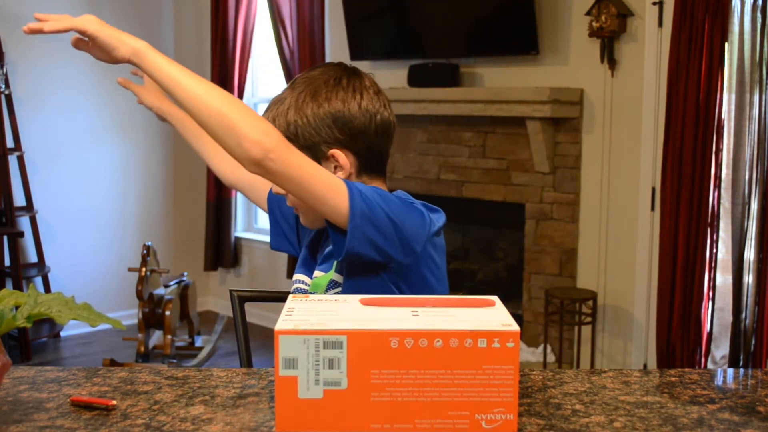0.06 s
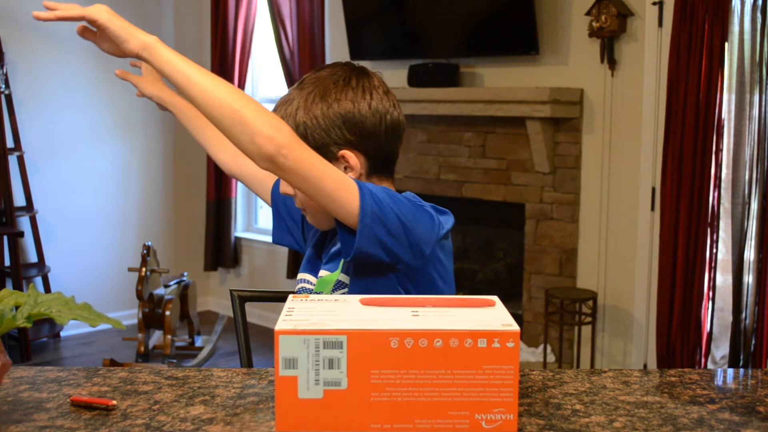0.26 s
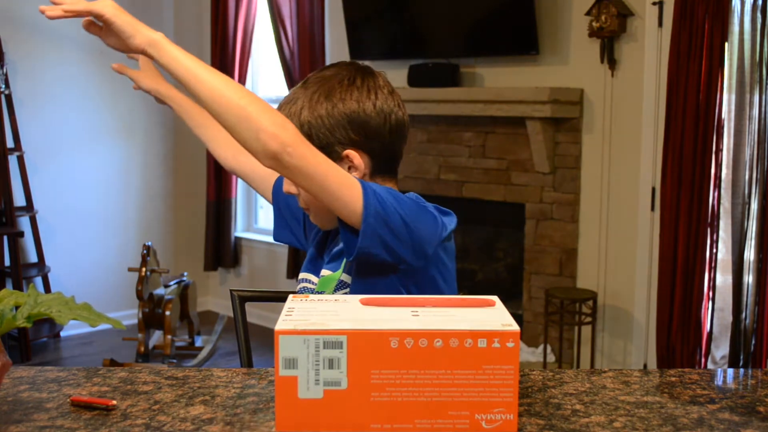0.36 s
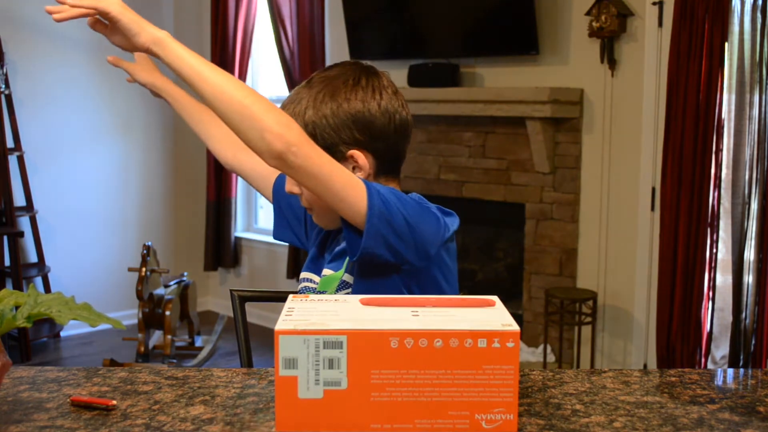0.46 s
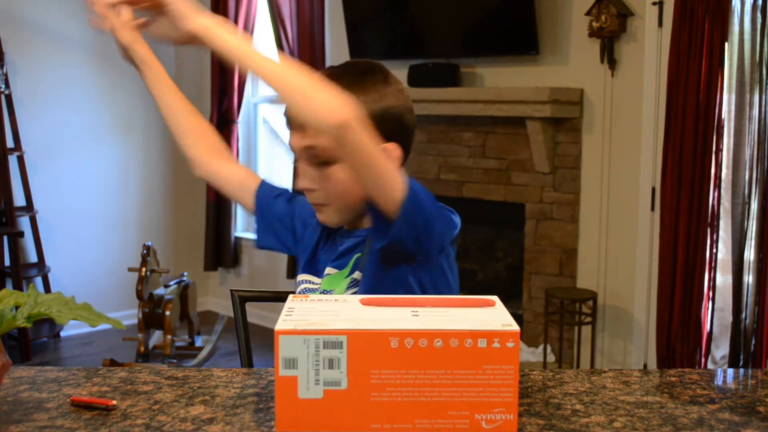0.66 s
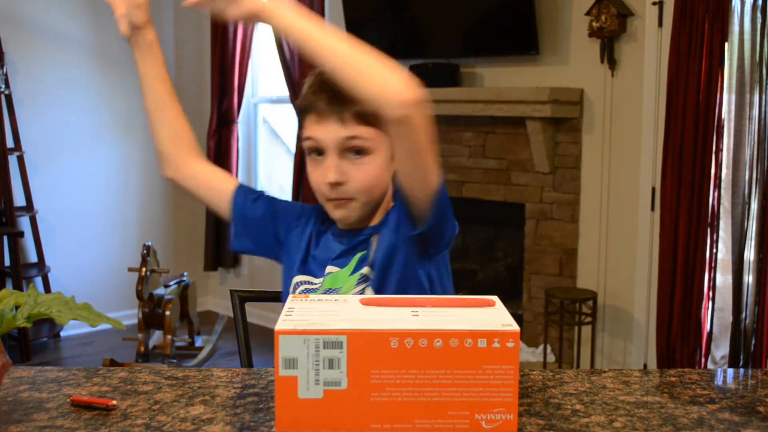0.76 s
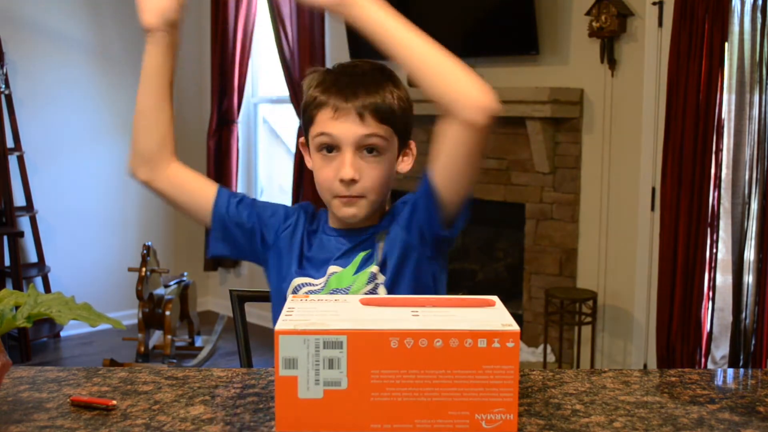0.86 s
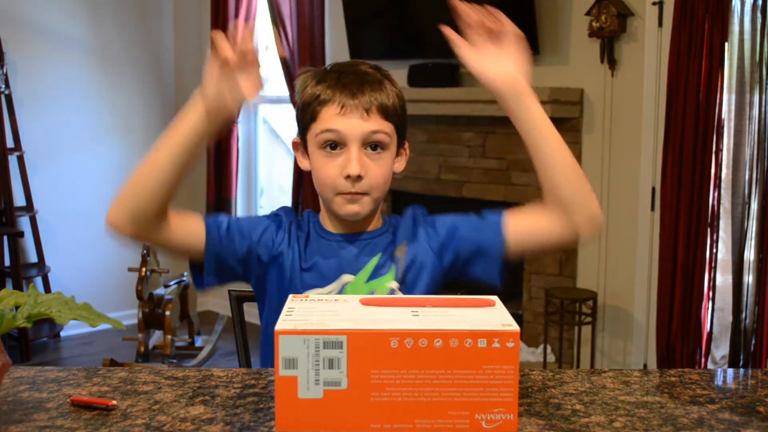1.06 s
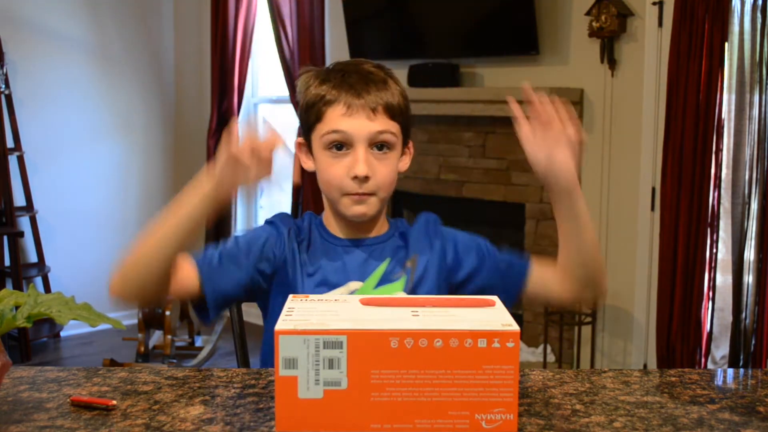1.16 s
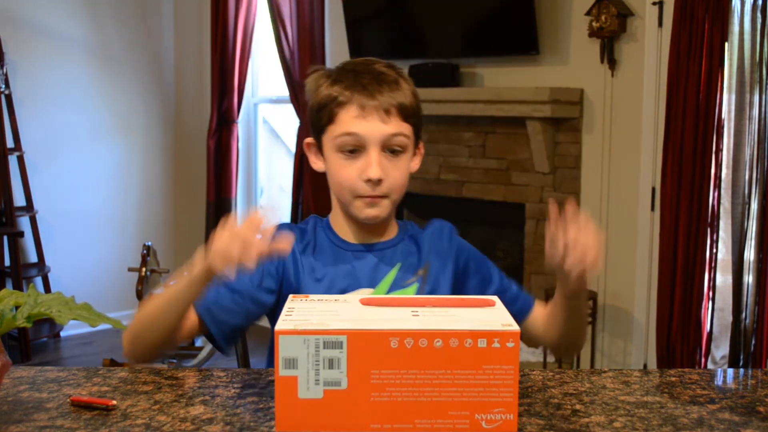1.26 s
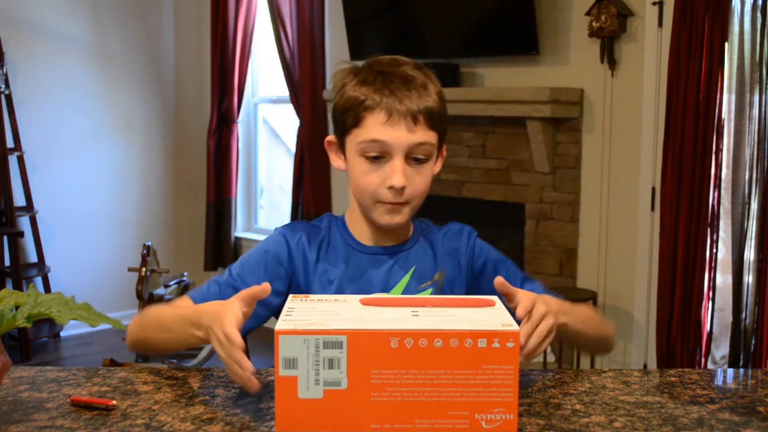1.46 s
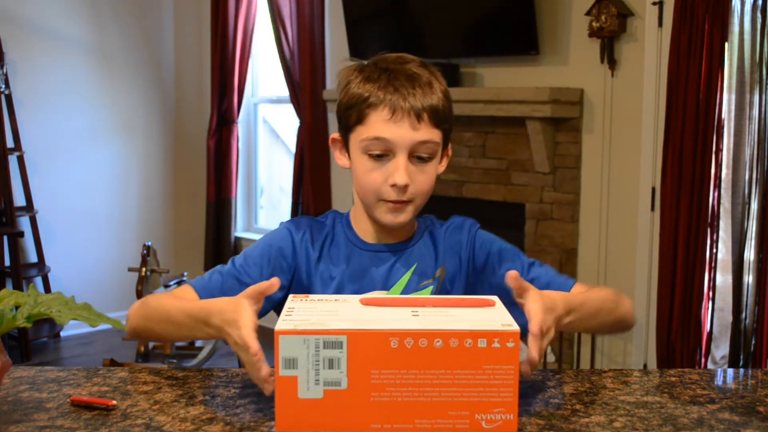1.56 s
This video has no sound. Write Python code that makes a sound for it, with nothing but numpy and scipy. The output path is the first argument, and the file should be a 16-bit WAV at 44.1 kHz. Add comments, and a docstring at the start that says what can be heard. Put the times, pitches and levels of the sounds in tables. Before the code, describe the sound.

An empty cardboard box lands on a hard floor a few metres away at about 0.2 seconds, with one loud, hollow thump that briefly overloads the microphone. The large room rings for most of a second. A faint bump follows at 0.5 seconds, then light taps from 0.8 to 1 second as the box settles. Sleeves rustle softly from 0.7 seconds, over quiet room tone and a faint appliance whine.

```python
"""Tossed carton in a live room

An empty cardboard carton lands on a hard floor a few metres away: an edge touches, the faces slap down,
later it tips over and settles. Each contact rings its panels and air, thuds and cracks; the large room
rings on for most of a second. Sleeves rustle, the treble swishes faintly twice, an appliance whines
faintly over the room tone, and the loudest peaks overload the microphone."""
import sys
import numpy as np
from scipy import signal
from scipy.io import wavfile

SR = 44100
rng = np.random.default_rng(int(sys.argv[2]) if len(sys.argv) > 2 else 0)


def put_to_file(sound):
    """Save the sound as 16-bit audio at rate SR, in the file named by the first command-line argument."""
    columns = np.atleast_2d(sound).T  # one column per channel
    safe = np.clip(columns, -1, 1)
    whole_steps = np.round(safe * 32767)
    wavfile.write(sys.argv[1], SR, whole_steps.astype(np.int16))


N = 70560

# Floor contacts. Each row: start in seconds, strength in dB, crack offset in dB, thud offset in dB,
# favoured pitch in Hz.
CONTACTS = [(0.1927, -5, 5.5, 8.5, 800), (0.199, -4, 8.5, -5, 620), (0.209, 4, -6, 1, 510),
            (0.221, -9.5, -16, -8, 450), (0.235, -1.5, -6, -15, 338), (0.247, -3, -7.5, -9.5, 310),
            (0.260, -0.5, -13.5, -15.5, 401), (0.294, -20.5, -19.5, -2, 445), (0.504, -24, -17, -3.5, 480),
            (0.810, -25.5, -10, 2, 480), (0.856, -36.5, -11, 1.5, 560), (0.940, -36, -16, -6, 302.4),
            (0.980, -30, -21, 1, 517), (1.02, -35.5, -15, -11, 521)]
# Spectrum of the echoes and the crack. Each row: frequency in Hz, relative density in dB.
IMPACT_SPECTRUM = [(30, -48), (60, -31), (85, -5.5), (150, -14.5), (230, -5), (300, -7.5), (430, -4.5),
                   (620, -8), (900, -13.5), (1300, -17), (2000, -23), (2600, -30), (3300, -24),
                   (4500, -48.5), (8000, -54), (12000, -59.5), (15400, -83)]


def from_db(db):
    """Decibels to gain."""
    return 10 ** (np.asarray(db) / 20)


def unit_rms(x):
    """Scale to rms 1."""
    return x / np.sqrt(np.mean(x ** 2) + 1e-20)


def at_hz(points, hz):
    """Interpolate a table on a log-frequency axis."""
    points_hz, values = np.transpose(points)
    return np.interp(np.log(hz), np.log(points_hz), values)


def drift(rate_hz):
    """Slow random wander, rms about 1."""
    hop, warm_up = 40, 2000
    pole = np.exp(-2 * np.pi * rate_hz * hop / SR)
    white = rng.standard_normal(N // hop + warm_up + 2)
    slow = signal.lfilter([1], [1, -2 * pole, pole * pole], white)[warm_up:]
    return np.interp(np.arange(N) / hop, np.arange(len(slow)), unit_rms(slow))


def ring(drive, hz, t60_s):
    """Resonator: a unit click starts a decaying sine of height 1."""
    pole, step_rad = from_db(-60 / (t60_s * SR)), 2 * np.pi * hz / SR
    return signal.lfilter([0, np.sin(step_rad)], [1, -2 * pole * np.cos(step_rad), pole * pole],
                          drive + 1e-18)


def noise_bands(spectrum):
    """Yield centre in Hz and noise for each third octave of a spectrum."""
    edges_hz = 25 * 2 ** (np.arange(29) / 3)
    white = rng.standard_normal((2, N + 8000))
    for k, (low_hz, high_hz) in enumerate(zip(edges_hz, edges_hz[1:])):
        hz = np.sqrt(low_hz * high_hz)
        band = signal.butter(2, [low_hz, high_hz], "band", fs=SR, output="sos")
        yield hz, from_db(at_hz(spectrum, hz)) * signal.sosfilt(band, white[k % 2])[-N:]


def contact_clicks(gains):
    """One click per floor contact."""
    clicks = np.zeros(N)
    clicks[(np.array(CONTACTS)[:, 0] * SR).astype(int)] = gains
    return clicks


def strike_modes(modes, strength_db, falloff_db_per_octave):
    """Each soft contact drives every mode, falling off from its favoured pitch; signs alternate."""
    scatter_db, build_up_cycles = 1.5, 4.7
    favoured_hz = np.array(CONTACTS)[:, 4]
    chance_db = scatter_db * rng.standard_normal((len(strength_db), len(modes)))
    out = 0
    for k, (hz, level_db, t60_s) in enumerate(modes):
        octaves_away = np.minimum(np.abs(np.log2(hz / favoured_hz)), 1.5)
        drive_db = strength_db + level_db - falloff_db_per_octave * octaves_away + chance_db[:, k]
        burst = ring(contact_clicks(from_db(drive_db)), hz, build_up_cycles / hz)
        burst_gain = 2 * np.log(1000) * hz / (SR * build_up_cycles)   # drives the mode like one click
        out = out + (-1) ** k * ring(burst_gain * burst, hz, t60_s)
    return out


def appliance_whine(width_hz=15):
    """Faint narrow lines, wavering in level and phase."""
    # Each row: frequency in Hz, rms level in dB.
    lines = [(161.5, -61), (527.6, -66), (2293, -76), (2353, -79), (2589, -78), (3316, -83)]
    t = np.arange(N) / SR
    out = 0
    for hz, level_db in lines:
        phase = 2 * np.pi * hz * t
        line = drift(width_hz) * np.sin(phase) + drift(width_hz) * np.cos(phase)
        out = out + from_db(level_db) * unit_rms(line)
    return out


def room_tone(level_db=-49):
    """Steady, mostly low background noise."""
    # Each row: frequency in Hz, relative density in dB.
    spectrum = [(15, -72), (25, -30), (43, -6), (86, -10.5), (160, 2), (204, -5.5), (297, -7.5), (495, -11),
                (536, -9), (683, -12), (2350, -31), (3720, -35), (15400, -59)]
    return from_db(level_db) * unit_rms(sum(noise for _, noise in noise_bands(spectrum)))


def carton(crack_t60_s=0.03):
    """Direct sound of the contacts: ringing panels and air, floor thud, papery crack."""
    # Panels and enclosed air. Each row: frequency in Hz, relative level in dB, T60 in seconds.
    box_modes = [(302, -2.5, 0.077), (411.2, -4, 0.13), (530, -1.5, 0.05), (607, -8.5, 0.02),
                 (740, -20, 0.04), (873, -5, 0.12), (1085, -19.5, 0.09), (1577, -27, 0.055),
                 (2060, -32, 0.028), (3460, -34, 0.036)]
    # Floor thud. Each row: frequency in Hz, relative level in dB, T60 in seconds.
    thud_modes = [(77.4, -37, .25), (91.4, -21, 0.3), (139.2, -23, 0.12)]
    _, strength_db, crack_db, thud_db, _ = np.transpose(CONTACTS)
    crack_clicks = contact_clicks(from_db(strength_db + crack_db - 30))
    crack_envelope = signal.lfilter([1], [1, -from_db(-60 / (crack_t60_s * SR))], crack_clicks)
    crack_noise = unit_rms(sum(noise for hz, noise in noise_bands(IMPACT_SPECTRUM) if hz > 900))
    box = strike_modes(box_modes, strength_db, falloff_db_per_octave=15.5)
    thud = strike_modes(thud_modes, strength_db + thud_db, falloff_db_per_octave=0)
    return box + thud + crack_envelope * crack_noise


def room_reverb(echo_db=-12.5, rise_s=0.004):
    """Each contact excites standing waves and diffuse echoes that swell, then die band by band."""
    # Room modes. Each row: frequency in Hz, relative level in dB, T60 in seconds.
    standing_waves = [(215.4, -24, 0.41), (257, -23.5, 1.69), (280, -28, 1.2), (299.6, -14, 1),
                      (409.6, -22.5, 0.77), (447, -23, .6), (466.6, -20, 0.42), (487, -30.5, 0.69),
                      (532.4, -33.5, 1.3), (603, -35, 0.22)]
    # Echo decay. Each row: frequency in Hz, T60 in seconds.
    decay_times = [(60, 0.67), (120, 0.27), (170, 0.74), (300, 0.7), (500, 0.84), (1100, 0.82),
                   (2900, 0.76), (5500, 0.49), (9000, 0.36), (14000, .3)]
    start_s, strength_db, crack_db, thud_db, _ = np.transpose(CONTACTS)
    t = np.arange(N) / SR
    bands = list(noise_bands(IMPACT_SPECTRUM))
    echo_gain = from_db(echo_db) / np.std(sum(noise for _, noise in bands))
    swell = 1 - np.exp(-t / rise_s)
    out = strike_modes(standing_waves, strength_db, falloff_db_per_octave=7.75)
    for hz, noise in bands:
        crack_weight = np.clip(np.log2(hz / 700) / 3, 0, 2)
        thud_weight = np.clip(np.log2(200 / hz), 0, 1)
        drive_db = strength_db + crack_weight * crack_db + thud_weight * thud_db
        energy = contact_clicks(from_db(drive_db) ** 2)
        power_tail = swell * from_db(-60 * t / at_hz(decay_times, hz)) ** 2
        power = np.maximum(signal.fftconvolve(energy, power_tail)[:N], 0) * (t >= start_s[0])
        out = out + echo_gain * np.sqrt(power) * noise
    return out


def swishes(low_hz=4470):
    """Two faint Gaussian swells of treble noise."""
    # Each row: centre in seconds, sigma in seconds, rms level at the centre in dB, upper edge in Hz.
    swells = [(0.45, 0.046, -71.5, 12000), (0.95, 0.058, -70.5, 7900)]
    t, white = np.arange(N) / SR, rng.standard_normal(N)
    out = 0
    for centre_s, sigma_s, level_db, high_hz in swells:
        band = signal.butter(2, [low_hz, high_hz], "band", fs=SR, output="sos")
        envelope = from_db(level_db) * np.exp(-0.5 * ((t - centre_s) / sigma_s) ** 2)
        out = out + envelope * unit_rms(signal.sosfilt(band, white))
    return out


def sleeves(flutter_db=0.05):
    """Cloth noise that swells and fades as the arms move."""
    # Rustle envelope. Each row: time in seconds, rms level in dB.
    contour = [(0.698, -54.5), (0.78, -51.5), (0.818, -47.5), (0.89, -54.5), (0.97, -49.5), (1.05, -52.5),
               (1.17, -61), (1.3, -68), (1.43, -68), (1.48, -57.5), (1.6, -60.5)]
    # Cloth spectrum. Each row: frequency in Hz, relative density in dB.
    spectrum = [(200, 9), (600, -16), (1500, 9), (3300, 0.5), (5000, -18.5), (9000, -40), (15000, -46)]
    time_s, level_db = np.transpose(contour)
    envelope = from_db(np.interp(np.arange(N) / SR, time_s, level_db, left=-120))
    common_drift = drift(rate_hz=21)
    cloth = sum(noise * from_db(flutter_db * (common_drift + drift(rate_hz=7.3)))
                for _, noise in noise_bands(spectrum))
    return envelope * unit_rms(cloth)


def scene():
    """All sources, summed to mono."""
    return (carton() + room_reverb() + sleeves() + appliance_whine() + room_tone() + swishes())[None]


def record(dry):
    """Microphone: bass cut, hiss, overload at full scale, top cut."""
    low_cut_hz, high_cut_hz, hiss_db, knee_exponent = 75, 15600, -76, 29
    high_pass = signal.butter(3, low_cut_hz, "high", fs=SR, output="sos")
    low_pass = signal.ellip(12, 0.1, 50, high_cut_hz, fs=SR, output="sos")
    mic = signal.sosfilt(high_pass, dry) + from_db(hiss_db) * rng.standard_normal(N)
    flattened = mic / (1 + np.abs(mic) ** knee_exponent) ** (1 / knee_exponent)
    return np.clip(signal.sosfilt(low_pass, flattened), -1, 1)


dry = scene()
out = record(dry)
put_to_file(out)
```